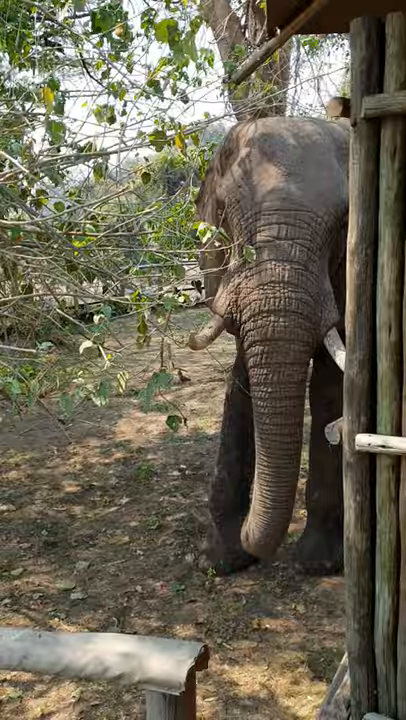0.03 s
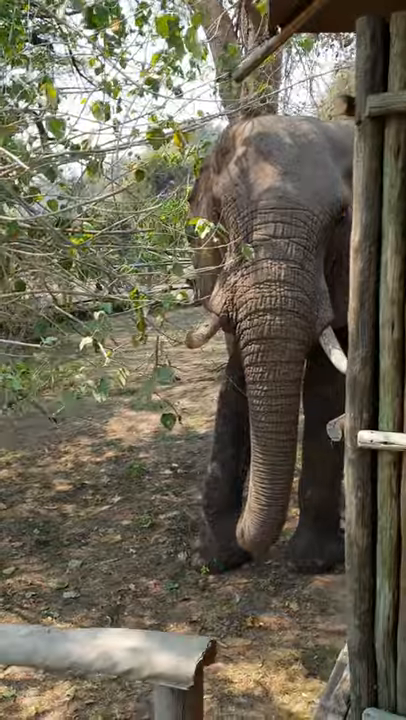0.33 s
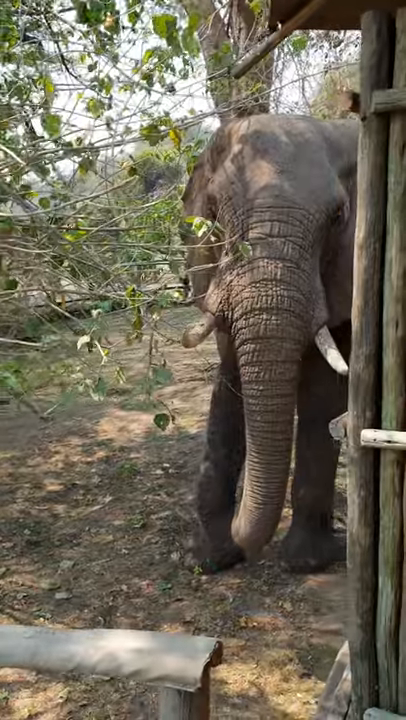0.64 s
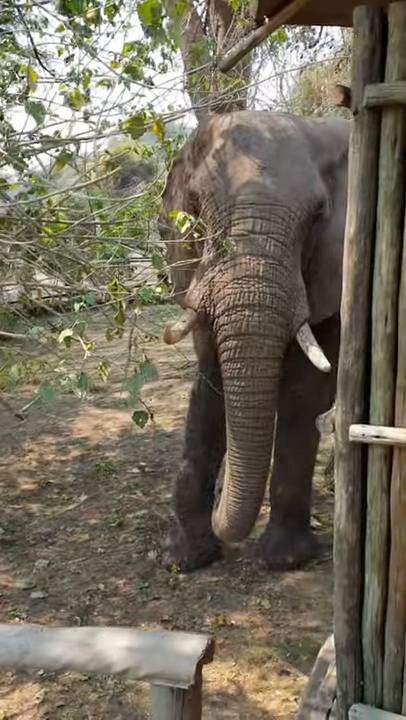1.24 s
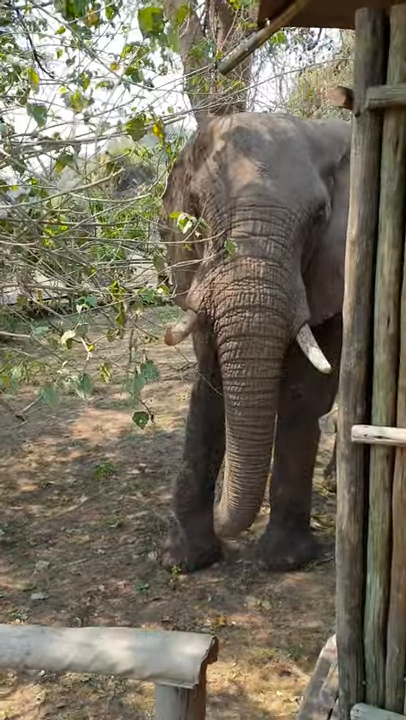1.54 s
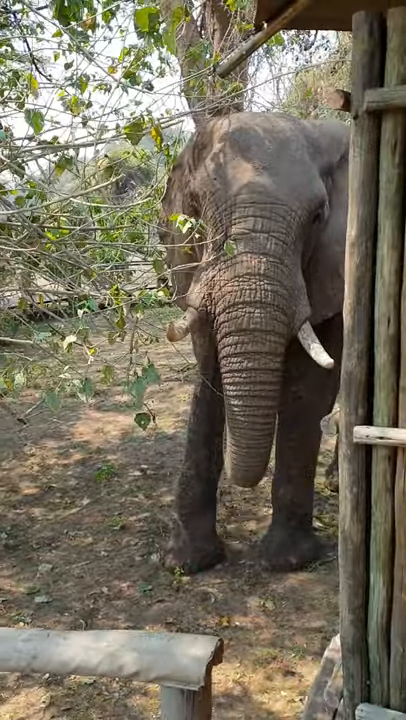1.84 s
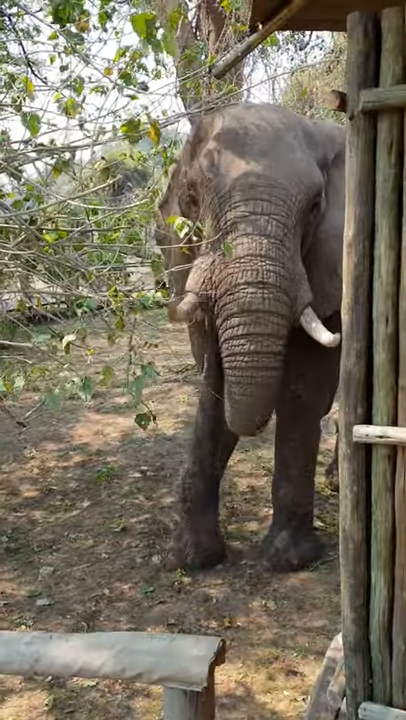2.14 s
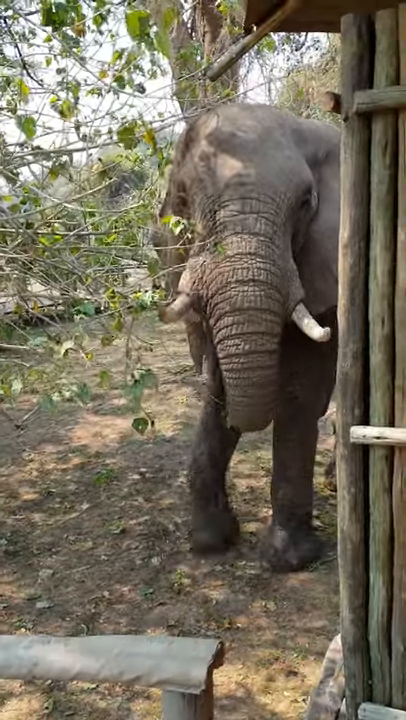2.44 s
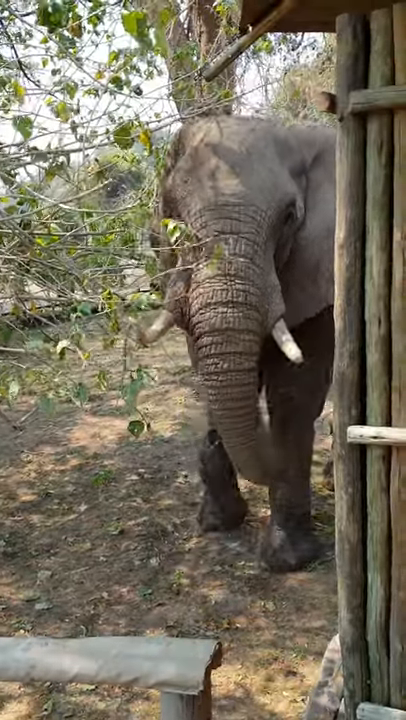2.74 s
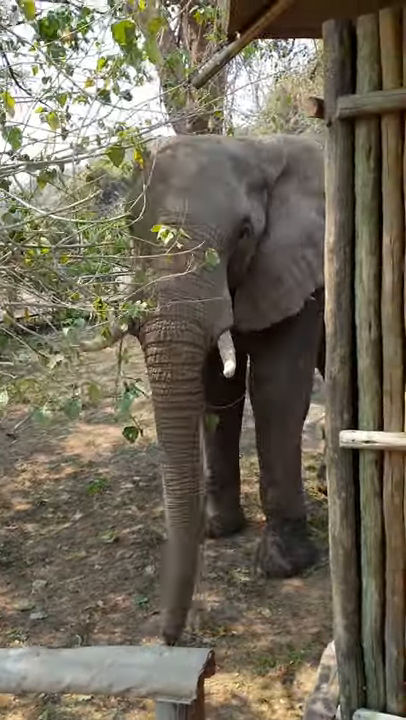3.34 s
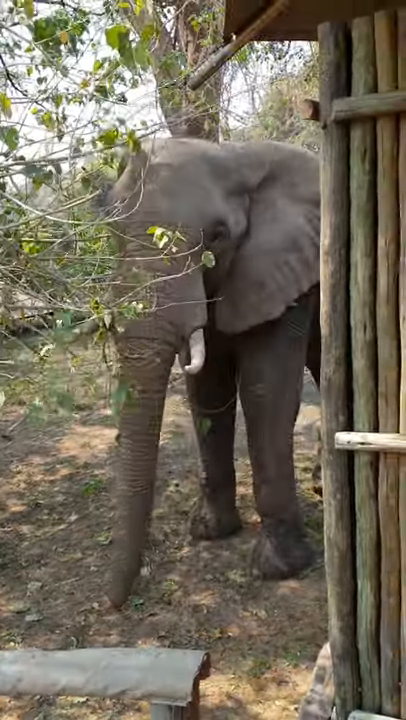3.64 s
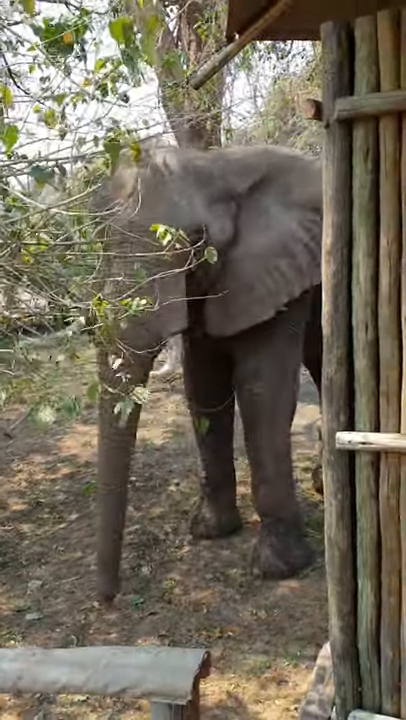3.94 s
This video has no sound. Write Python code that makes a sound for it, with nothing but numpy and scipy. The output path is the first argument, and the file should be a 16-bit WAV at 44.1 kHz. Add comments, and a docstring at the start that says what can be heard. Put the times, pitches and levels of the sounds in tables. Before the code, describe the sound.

A light breeze buffets the microphone with a low, uneven rumble in open bush. Beneath it an elephant blows softly, a twig cracks, and feet rustle dry leaves before a second blow. Faint insects hiss on the right.

```python
"""Beside a lodge, a light breeze buffets the two microphone ports with a low, lumpy rumble and insects
hiss far to the right. An elephant blows hollowly through its trunk; a leaf snaps, a twig cracks and a
distant cricket trills twice. From about two seconds the elephant shifts its feet in dry leaves.
Just past halfway the insects thin out, a bird whistles faintly and a foot settles on the left.
Near the end the elephant blows again, over the rustle of its feet."""
import sys
import numpy as np
from scipy import signal
from scipy.fft import rfft, irfft
from scipy.io import wavfile

SR = 44100
rng = np.random.default_rng(int(sys.argv[2]) if len(sys.argv) > 2 else 0)


def persist_wave(psi):
    """Save psi, clipped to +-1, as 16-bit WAV."""
    counts = np.round(np.clip(psi, -1, 1) * 32767).astype(np.int16)
    wavfile.write(sys.argv[1], SR, np.atleast_2d(counts).T)


N = 176400
T = np.arange(N) / SR
HZ = np.fft.rfftfreq(N, 1 / SR)


def amp(db):
    """Decibels to gain."""
    return 10 ** (np.asarray(db) / 20)

def pan(left_db, right_db):
    """A gain for each microphone port."""
    return amp([[left_db], [right_db]])

def unit_rms(x):
    """Scales to rms 1."""
    return x / np.sqrt(np.mean(x ** 2) + 1e-20)

def curve(rows, column=1):
    """One column of a time table at every sample."""
    rows = np.array(rows)
    return np.interp(T, rows[:, 0], rows[:, column])

def during(rows):
    """True over the time that a table spans."""
    return (T >= rows[0][0]) & (T <= rows[-1][0])

def spectrum(rows, column=1):
    """One column of a frequency table at every bin."""
    rows = np.array(rows)
    return np.interp(np.log(HZ + 1), np.log(rows[:, 0]), rows[:, column])

def colour(x, db):
    """Filters by a gain in dB per bin."""
    return irfft(rfft(x) * amp(db), N)

def white():
    """Fresh white noise."""
    return rng.standard_normal(N)

def hiss(db):
    """Noise with a given level per Hz."""
    return colour(white(), db) * np.sqrt(SR / 2)

def wander(hz):
    """Random drift up to a rate, rms 1."""
    return unit_rms(irfft(rfft(white()) / (1 + (HZ / hz) ** 4), N))

def resonate(x, hz, width_hz):
    """A steep resonance that follows a pitch curve, rms 1."""
    carrier = np.exp(2j * np.pi * np.cumsum(hz * np.ones(N)) / SR)
    pole = np.exp(-np.pi * abs(width_hz) / SR)
    baseband = signal.lfilter([1], [1, -2 * pole, pole * pole], x / carrier)
    return unit_rms((carrier * baseband).real)

def diffuse_band(hz, width_hz):
    """A band of noise, unrelated at the two ports."""
    return np.array([resonate(white(), hz, width_hz) for _ in range(2)])

def arch(start, length):
    """A rounded rise and fall."""
    return np.sqrt(abs(np.sin(np.pi * np.clip((T - start) / length, 0, 1))))

def strike(start, decay_s, rise_s=0.001):
    """A quick rise and an exponential fall."""
    age = np.maximum(T - start, 0)
    return np.minimum(age / rise_s, 1) * np.exp(-age / decay_s)

def crackle(tint, cracks_per_s=1200, spread_db=2, share=0.2):
    """A crowd of tiny fractures of uneven size in a bed of noise, coloured for each port."""
    cracks = rng.random(N) < cracks_per_s / SR
    sizes = cracks * amp(spread_db * np.minimum(rng.exponential(1, N), 4))
    ports = []
    for sign in (1, -1):
        grains = np.sqrt(share) * unit_rms(sizes * white()) + np.sqrt(1 - share) * white()
        ports.append(colour(grains, spectrum(tint) + sign * spectrum(tint, column=2) / 2))
    return unit_rms(np.array(ports))


# still air all round the microphone: f/Hz, level/dB per Hz
BUSH_AIR = [(100, -99.5), (250, -101), (500, -107), (800, -110), (2000, -111), (2800, -109), (4200, -108),
            (5500, -109), (7500, -108), (9000, -117), (16000, -116)]

def bush_air():
    """The faint, steady hiss of the open bush."""
    return np.array([hiss(spectrum(BUSH_AIR)) for _ in range(2)])

# insects far to the right: f/Hz, full level/dB per Hz, thinned level/dB per Hz
INSECT_CHORUS = [(300, -125, -130), (564, -108, -117), (770, -100, -114), (1116, -103, -112),
                 (1560, -95, -97), (2226, -95.5, -97.5), (2714, -85.5, -92.5), (3490, -97, -103),
                 (4000, -93.5, -105), (4960, -96.5, -103), (6000, -92.5, -100.5), (7160, -104, -111),
                 (8700, -111, -116), (10700, -109, -112), (11600, -122, -124), (16000, -126, -128)]

def insects(thin_s=2.46, fade_s=0.013):
    """A dense, slightly fluttering chorus, part of which falls silent."""
    thinned = np.clip((T - thin_s) / fade_s + .5, 0, 1)
    full = np.sqrt(1 - thinned) * hiss(spectrum(INSECT_CHORUS))
    sparse = np.sqrt(thinned) * hiss(spectrum(INSECT_CHORUS, column=2))
    return np.array([np.zeros(N), (full + sparse) * amp(.5 * wander(hz=39.7))])

# a cricket out in the bush: t/s, length/s, level/dB
CRICKET_TRILLS = [(0.754, 0.38, -68), (1.467, 0.39, -70)]

def cricket(throb_hz=27):
    """Short throbbing trills, blurred by distance."""
    level = sum(amp(db) * arch(start, length) for start, length, db in CRICKET_TRILLS)
    throb = 1 + .6 * np.sin(2 * np.pi * throb_hz * T)
    return level * throb * diffuse_band(3760, width_hz=350)

# a distant bird right of centre, one falling whistle and one rising: t/s, f/Hz, relative level/dB
BIRD_WHISTLES = [
    [(2.39, 3000, -73), (2.44, 2796, -61), (2.462, 2440, -68), (2.485, 2410, -66), (2.54, 2400, -78)],
    [(2.8, 3600, -75), (2.86, 3760, -67), (2.915, 3690, -80), (2.95, 3720, -66), (3.0, 3890, -69),
     (3.035, 3880, -81)],
]

def bird(flutter_hz=70, flutter_db=4, jitter=.009):
    """Thin, fluttering whistles, each with a blur of scattered echoes."""
    out = np.zeros((2, N))
    for rows in BIRD_WHISTLES:
        hz = curve(rows)
        phase = 2 * np.pi * np.cumsum(hz * (1 + jitter * wander(flutter_hz))) / SR
        whistle = unit_rms(np.sin(phase) * amp(flutter_db * wander(flutter_hz)))
        echoes = diffuse_band(hz, width_hz=220)
        out += during(rows) * amp(curve(rows, column=2)) * (whistle + echoes)
    return out * pan(-5, -1)

# a murmur that rides on the breeze: t/s, level/dB
MURMUR_LEVEL = [(1.0, -94), (1.75, -73), (2.35, -70), (2.6, -75.5), (2.8, -69.5), (3.1, -79.5),
                (3.6, -71.5), (4.0, -68)]

def murmur(apart=0.37):
    """A soft hollow band above the rumble, nearly alike at both ports."""
    common = white()
    ports = [resonate(common + apart * white(), 305, width_hz=154) for _ in range(2)]
    return amp(curve(MURMUR_LEVEL)) * np.array(ports)

# breeze right on the microphone: t/s, left level/dB, right level/dB
BREEZE_LEVEL = [(.1, -68, -67), (.35, -55.5, -59.5), (.75, -60, -66.5), (1.1, -56.5, -61.5),
                (1.4, -50.5, -54), (1.55, -55, -49), (1.8, -50, -42.5), (2.05, -41.5, -50),
                (2.2, -51, -52.5), (2.33, -44, -45), (2.5, -49.5, -47), (2.8, -44.5, -51.5),
                (3.0, -47, -47), (3.13, -54, -52), (3.3, -46, -46.5), (3.6, -54, -48.5), (3.85, -40, -41.5),
                (4.0, -54, -38.5)]
# its rumble in the ports: f/Hz, relative level/dB
RUMBLE_COLOUR = [(10, -19), (25, -2), (50, 6.5), (85, 0.5), (120, -7.5), (160, -15), (210, -26),
                 (280, -35.5), (400, -57), (900, -81)]
# eddies that hit one port: t/s, level/dB, f/Hz, port (0 left, 1 right)
PORT_EDDIES = [(1.04, -36.5, 70, 0), (1.296, -34.5, 81.5, 0), (1.335, -39.5, 83, 0), (1.445, -38, 77, 0),
               (1.745, -34.5, 65.3, 1), (1.788, -36, 88, 1), (1.819, -32.5, 58.5, 0), (1.857, -32, 71.5, 1),
               (1.887, -28.5, 81, 1), (1.962, -32, 80, 0), (1.989, -29, 72, 1), (2.06, -29, 61, 0),
               (2.108, -30, 61, 0), (2.146, -29.5, 77, 0), (2.339, -33, 66.5, 0), (2.464, -25, 77, 1),
               (2.535, -29, 70.5, 1), (2.577, -30, 87.6, 0), (2.602, -32, 66, 1), (2.612, -30, 82, 0),
               (2.771, -31, 102, 0), (2.803, -31, 104, 0), (2.969, -37, 86, 1), (2.995, -31, 54.4, 1),
               (3.02, -32, 63.7, 1), (3.26, -39, 55.5, 1), (3.305, -33, 78, 1), (3.431, -37.5, 58, 1),
               (3.754, -24.5, 72, 1), (3.813, -30, 74, 0), (3.851, -33, 69.5, 0), (3.868, -28.5, 84.5, 1),
               (3.959, -32, 68, 1)]

def wind(lump_db=2.9, rebound=0.53, wake_db=-24, wake_s=0.0097):
    """Each port has its own lumpy turbulence; an eddy sucks at it, rebounds and leaves a small wake."""
    ports = []
    for port in range(2):
        flow = unit_rms(colour(white(), spectrum(RUMBLE_COLOUR)))
        lumpy = unit_rms(flow * amp(lump_db * wander(hz=20.3)))
        pressure = lumpy * amp(curve(BREEZE_LEVEL, column=port + 1))
        wake = amp(wake_db) * resonate(white(), 138, width_hz=90)
        for at, db, hz, side in PORT_EDDIES:
            if side == port:
                u = (T - at) * hz * np.pi * np.sqrt(2)  # time scaled so the pulse is strongest near hz
                suction = (u ** 2 - 1 + rebound * u) * np.exp(-.5 * u ** 2)
                pressure += amp(db) * (suction + wake * np.exp(-.5 * ((T - at) / wake_s) ** 2))
        ports.append(pressure)
    return np.array(ports)

def tick(start=.896, db=-47):
    """A small dry tick on the right."""
    envelope = amp(db) * strike(start, decay_s=0.0024, rise_s=0.0008)
    return envelope * resonate(white(), 1720, width_hz=1500) * pan(-15, 0)

# ring of a twig near the lodge: f/Hz, width/Hz, left gain/dB, right gain/dB
TWIG_RING = [(2540, 220, -14, -4.5), (4020, 600, -12, -14), (7300, 1400, -9.5, -14),
             (10800, 9400, -15, -20)]

def twig(start=1, db=-47, echo_db=-7):
    """A sharp crack with a short woody ring and a faint echo from the lodge."""
    ring = sum(pan(left, right) * diffuse_band(hz, width) for hz, width, left, right in TWIG_RING)
    crack = strike(start, decay_s=0.009, rise_s=.0006)
    echo = amp(echo_db) * strike(start, decay_s=0.042)
    return amp(db) * (crack + echo) * ring

# a foot on dry earth, left of the microphone: f/Hz, relative level/dB
FOOT_COLOUR = [(40, -18), (130, 3), (200, -8), (290, -23), (500, -28), (1100, -27), (4000, -37),
               (16000, -65)]

def footstep(start=2.745, length_s=0.07, db=-47.5):
    """The foot settles with a soft, gritty thud."""
    thud = np.array([unit_rms(colour(white(), spectrum(FOOT_COLOUR))) for _ in range(2)])
    return amp(db) * arch(start, length_s) ** 2 * thud * pan(0, -15)

# dry leaves where the elephant stands: t/s, level/dB
RUSTLE_LEVEL = [(1.9, -76), (2.15, -67.5), (2.35, -62.5), (2.53, -63.5), (2.68, -64.5), (2.76, -58.5),
                (2.9, -62.5), (3.03, -65), (3.23, -57), (3.35, -61), (3.44, -60), (3.57, -62),
                (3.72, -58.5), (3.85, -53), (3.93, -59), (4.0, -58)]
# a rustle and a snap at the microphone: f/Hz, relative level/dB, left minus right/dB
RUSTLE_COLOUR = [(151, 11, 0.5), (710, -11, 9.5), (1590, -4, -6), (2200, -4.5, 2), (3150, -2.5, 8),
                 (4560, 3, 3), (5820, 4, -5.5), (7900, -8.5, 20.5), (9100, -5.5, -3.5), (10860, -3, 3.5),
                 (12300, -7.5, 9), (16900, -11, 5)]
SNAP_COLOUR = [(150, -29, 4), (1000, -7, 6), (2470, 1, -9), (4500, 5, 5), (5930, 5.5, -13), (7900, 0, 17),
               (9100, -2, -1), (10500, 0.5, 7), (13200, -7, 15), (16000, -20.5, 6)]
# single leaves snapping: t/s, level/dB, decay/s, tilt above 1 kHz/dB per octave
LEAF_SNAPS = [(.63, -67, 0.024, 3), (0.656, -51.5, 0.019, -4), (2.687, -55, 0.0046, 11),
              (2.825, -56.5, 0.043, -2.5), (3.098, -57, 0.016, 0.5), (3.17, -59.5, 0.034, -4),
              (3.393, -55, 0.032, -2.5), (3.44, -57, 0.025, 4), (3.537, -56, 0.042, 0.5),
              (3.616, -51, 0.014, 0.5), (3.668, -53, 0.012, 1), (3.695, -54.5, 0.07, -1.5)]
# stalks scraping: t/s, length/s, level/dB, f/Hz
STALK_SCRAPES = [(2.718, 0.062, -68, 10700), (3.688, 0.046, -57.5, 5000), (3.693, .085, -63, 5800),
                 (3.836, 0.018, -51, 5200), (3.853, 0.013, -59, 4670)]

def leaves():
    """Dragged leaves rustle underfoot; a few snap, each with its own brightness, and stalks squeak."""
    rustle = amp(curve(RUSTLE_LEVEL) + wander(hz=24.8)) * crackle(RUSTLE_COLOUR)
    grains = crackle(SNAP_COLOUR)
    octaves = np.log2(np.maximum(HZ, 1000))
    snaps = sum(amp(db) * strike(start, decay, rise_s=0.0019) * unit_rms(colour(grains, tilt * octaves))
                for start, db, decay, tilt in LEAF_SNAPS)
    scrapes = sum(amp(db) * arch(start, length) * diffuse_band(hz, width_hz=620)
                  for start, length, db, hz in STALK_SCRAPES)
    return rustle + snaps + scrapes

# the elephant by the lodge, one table a blow: t/s, hollow level/dB, resonance f/Hz, left hiss level/dB
TRUNK_BLOWS = [
    [(.07, -73.5, 362, -80), (.2, -63.5, 357.7, -61.5), (.34, -58.5, 357, -58), (.45, -63.5, 391, -60.5),
     (.7, -67, 396, -58), (.8, -64.5, 401.5, -64), (.93, -70, 380, -90), (1.0, -85, 378, -90)],
    [(3.48, -84, 343, -106), (3.65, -65, 344.4, -61.5), (3.9, -63, 342.6, -58), (4.0, -63, 339, -63)],
]
# hiss at the nostrils: f/Hz, relative level/dB
NOSTRIL_COLOUR = [(40, -21), (150, 3.5), (220, -7.5), (450, 4.5), (750, -6.5), (1200, 3), (1600, 2),
                  (1900, 0), (2250, 2), (3300, -4.5), (5200, 0.5), (7000, -3), (9000, -15.5), (16000, -21)]

def trunk(blow, mode_step=0.1145, hollow_octaves=0.28, scatter_hz=1530):
    """Rushing air rings the trunk's close pipe modes under one hollow resonance and hisses at the tip."""
    centre_hz, breath = curve(blow, column=2), white()
    ratios = 1 + mode_step * np.arange(-4, 5)
    weights = np.exp(-.5 * (np.log2(ratios) / hollow_octaves) ** 2)
    modes = sum(weight * resonate(breath, centre_hz * ratio, width_hz=28)
                for ratio, weight in zip(ratios, weights))
    hollow = unit_rms(modes) * amp(curve(blow))
    # below scatter_hz both ports hear the same hiss; above it the hiss reaches them unrelated
    nostril_db = spectrum(NOSTRIL_COLOUR)
    direct = colour(white(), nostril_db - 10 * np.log10(1 + (HZ / scatter_hz) ** 2))
    scattered_db = nostril_db - 10 * np.log10(1 + (scatter_hz / (HZ + 1)) ** 2)
    tip = np.array([unit_rms(direct + colour(white(), scattered_db)) for _ in range(2)])
    return during(blow) * (hollow + tip * amp(curve(blow, column=3)) * pan(0, -3))


def scene():
    """Bush, breeze and elephant from one microphone position beside the lodge."""
    air = bush_air()
    elephant = sum(trunk(blow) for blow in TRUNK_BLOWS) + leaves() + twig() + footstep()
    return air + wind() + murmur() + elephant + insects() + cricket() + bird() + tick()

def record(dry, low_cut_hz=24, top_hz=15850, start_s=0.063, fade_s=0.012):
    """The microphone opens after a moment, drops the deepest bass and cuts the top treble steeply."""
    bass_cut = irfft(rfft(dry) * HZ ** 2 / np.hypot(HZ ** 2, low_cut_hz ** 2), N)
    opened = bass_cut * np.clip((T - start_s) / fade_s, 0, 1)
    lowpass = signal.firwin(511, top_hz, window=("kaiser", 9), fs=SR)
    return signal.oaconvolve(opened, lowpass[None], "same", axes=1)


dry = scene()
out = record(dry)
persist_wave(out)
```